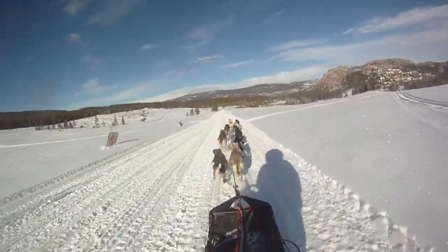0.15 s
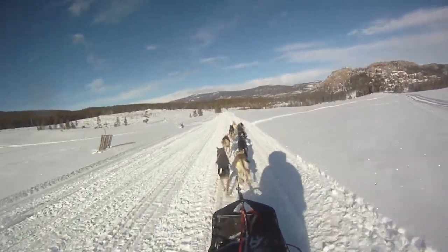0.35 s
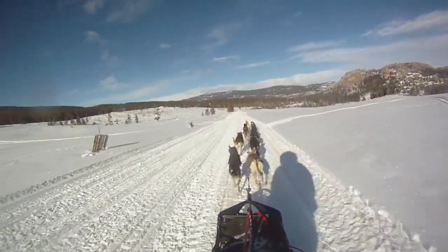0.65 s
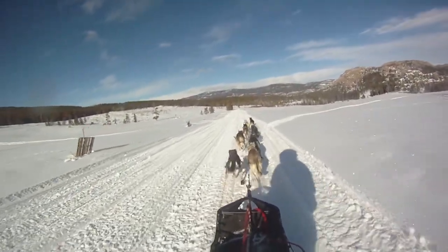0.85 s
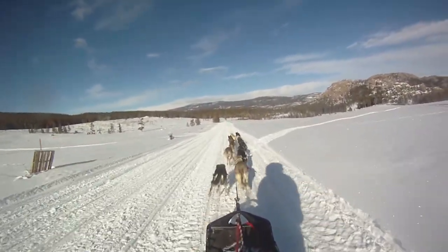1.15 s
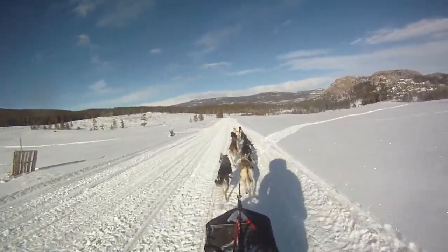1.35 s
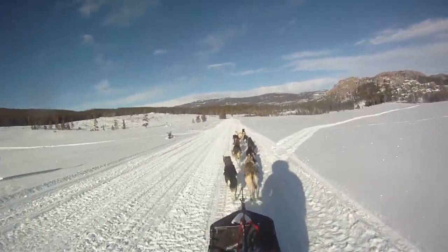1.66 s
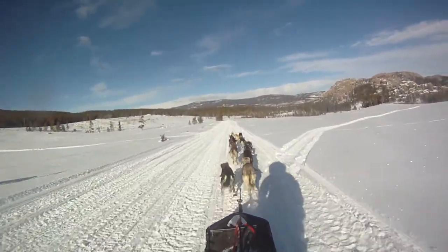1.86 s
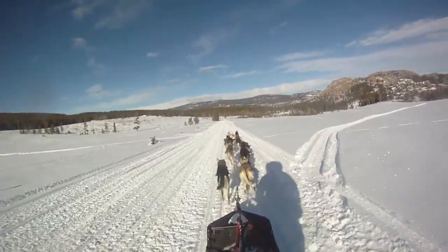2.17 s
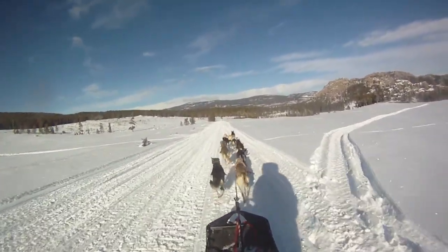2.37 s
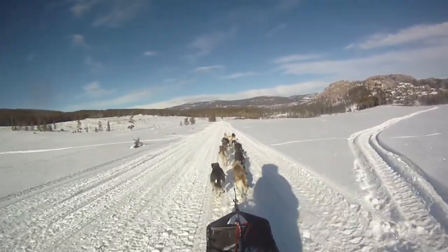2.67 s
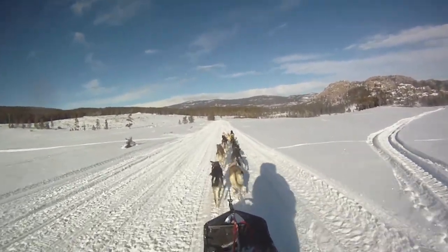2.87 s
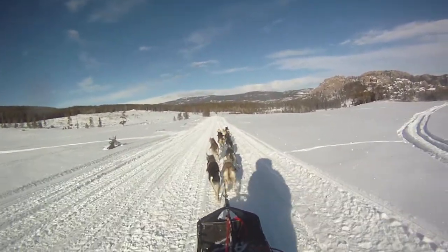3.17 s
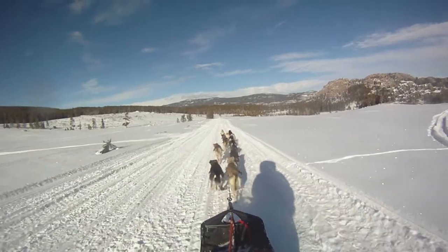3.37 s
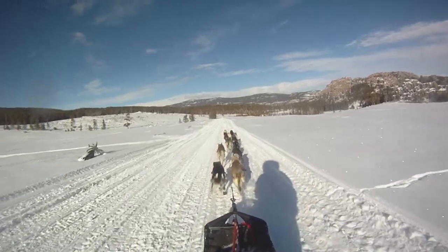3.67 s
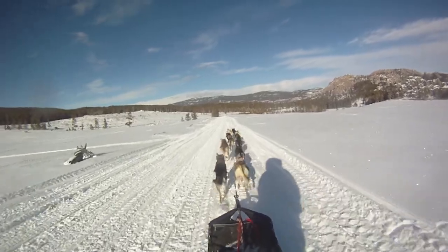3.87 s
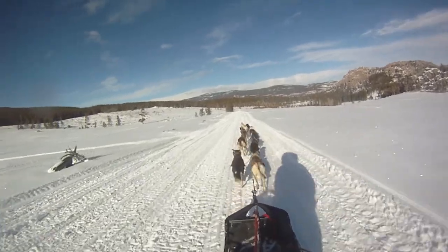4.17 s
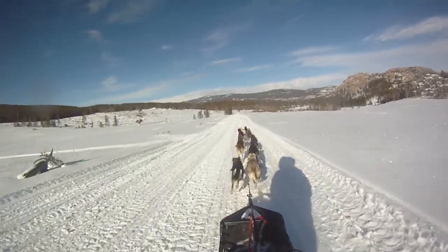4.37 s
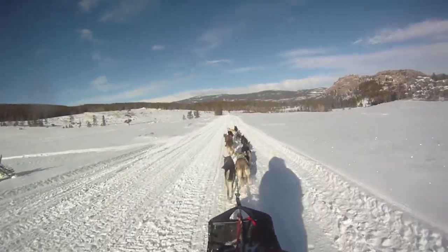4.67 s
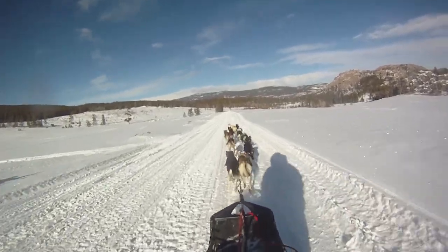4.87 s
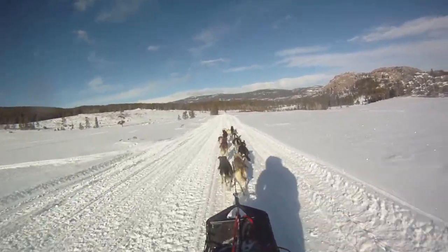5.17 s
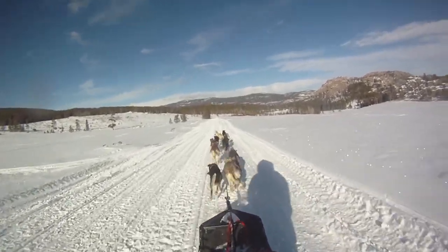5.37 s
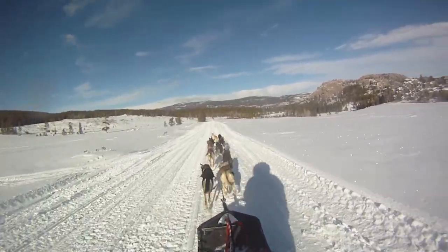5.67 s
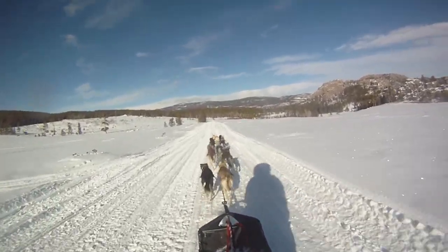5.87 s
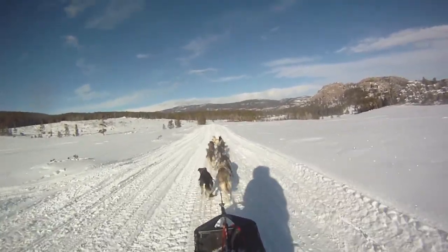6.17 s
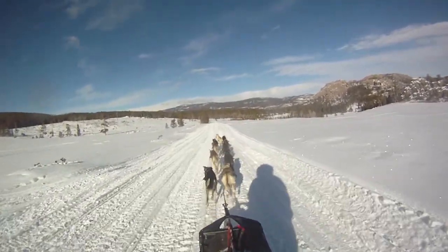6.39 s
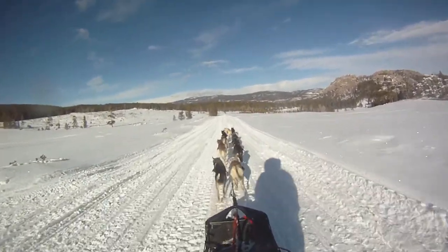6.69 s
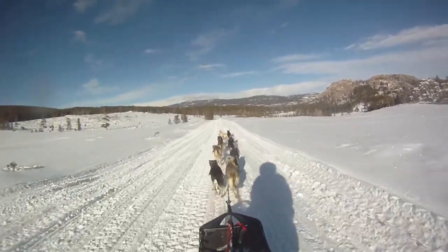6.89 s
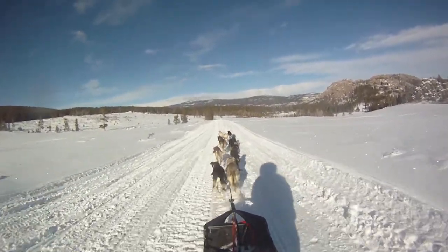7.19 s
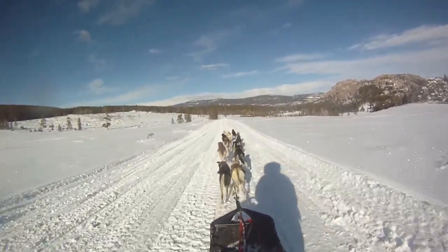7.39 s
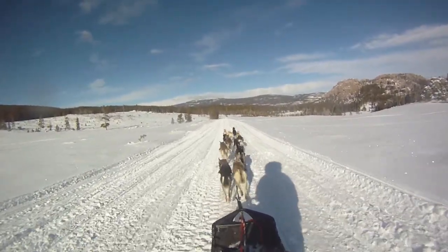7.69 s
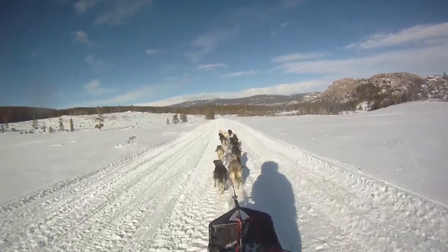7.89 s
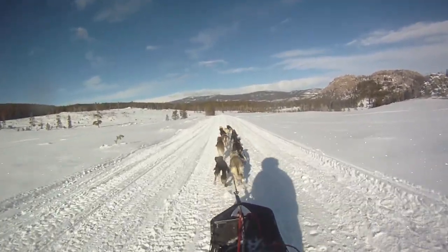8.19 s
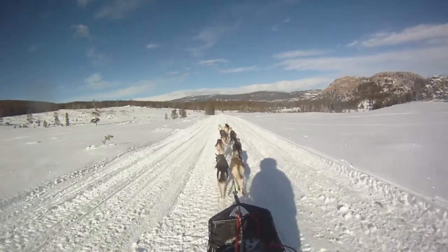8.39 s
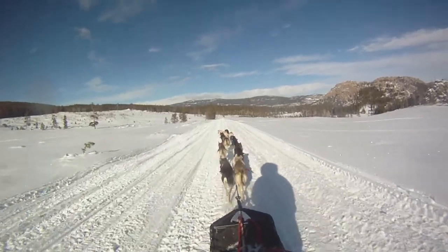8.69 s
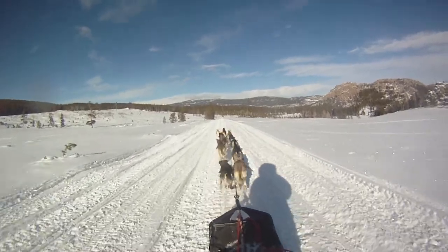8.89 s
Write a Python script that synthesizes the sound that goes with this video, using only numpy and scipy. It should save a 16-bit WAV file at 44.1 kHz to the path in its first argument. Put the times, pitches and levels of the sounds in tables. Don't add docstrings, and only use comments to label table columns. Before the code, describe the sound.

A sled runs fast behind dogs over packed snow. The runners give a constant boxy hiss and grainy crunch, broken by irregular knocks, crisp crust cracks and tiny pings. The wooden frame thrums low, metal snaps jingle faintly, and wind rumbles against a small enclosed microphone on the sled. One sharp tick comes past the six-second mark.

```python
import sys
import numpy as np
from scipy import signal
from scipy.io import wavfile
from scipy.ndimage import uniform_filter1d

SR = 44100
rng = np.random.default_rng(int(sys.argv[2]) if len(sys.argv) > 2 else 0)


def wav_record(signal):
    frames = np.transpose(np.atleast_2d(signal))
    bounded = np.clip(frames, -1, 1)
    quanta = np.round(bounded * 32767).astype(np.int16)
    wavfile.write(sys.argv[1], SR, quanta)


def how_loud(loudness_db):
    steps = np.asarray(loudness_db, float) / 20
    return 10 ** steps


N = 398663

# (time [s], glide level [dB], roughness of the trail [dB])
GLIDE = [(0, -46, -1), (.3, -49, -0.5), (.9, -49, -2.5), (1.5, -49.5, -0.5), (1.9, -49, -1.5),
         (2.4, -46.5, 0.5), (2.8, -48, 1), (3.2, -45.5, 0.5), (3.7, -46.5, 2.5), (4.2, -49, 1.5),
         (4.8, -46.5, 1.5), (5.5, -48, 0.5), (6, -46.5, -1), (6.8, -48.5, -1), (7.4, -48.5, -1.5),
         (8.2, -46, -1.5), (8.7, -48, 0.5), (9.04, -49, 1.5)]
# (frequency [Hz], density [dB per Hz])
HOUSING_SPECTRUM = [(310, -30), (520, -8.5), (716, -10), (913, -6), (1060, 1), (1240, -8.5), (1410, -10),
                    (1570, -4.5), (1665, 1.5), (1760, -.5), (1900, -2), (2100, -8.5), (2400, -16.5),
                    (3300, -54.5)]
# (frequency [Hz], density [dB per Hz])
CRISP_SPECTRUM = [(1700, -22), (2150, -12.5), (2330, -0.5), (2390, -17), (2550, -6), (2950, 0.5),
                  (3300, -3.5), (3750, -8.5), (4000, -6.5), (4600, -9.5), (5100, -12), (5700, -19.5),
                  (6000, -31), (6600, -63.5)]
# (time [s], peak level [dB], thud under it [dB])
BUMPS = [(0.081, -36, -3), (1.104, -39.5, 7), (1.249, -35.5, 7.5), (1.41, -37.5, 5.5), (1.792, -43, -3),
         (1.995, -36.5, 4.5), (2.185, -36.5, 8.5), (2.336, -37, 5), (2.396, -32, -2), (2.493, -38, 8),
         (2.625, -39, -2), (2.696, -35, -3), (2.929, -33.5, -5), (3.015, -35, 10.5), (3.088, -40, 12),
         (3.441, -37, 9), (3.522, -35, 4), (3.775, -40, 2), (4.097, -37.5, 10), (4.193, -39, 8.5),
         (4.383, -33, -2), (5.121, -44, 9), (5.925, -36.5, 0), (6.41, -37.5, 6), (6.467, -35, 0),
         (6.956, -31, 5), (7.067, -35, -7), (8.11, -41, -3), (8.334, -35, -8), (8.526, -37, 4)]
# (time [s], peak level [dB], frequency [Hz])
PINGS = [(0.094, -28, 1700), (0.412, -30, 1690), (0.788, -31.5, 1820), (0.9067, -28, 1830),
         (1.3266, -36, 1760), (2.373, -28, 1680), (3.008, -26, 1680), (3.0685, -26, 1670),
         (3.2101, -28, 1690), (3.4825, -34, 1800), (3.509, -26, 1720), (3.5369, -30, 1730),
         (3.5768, -32, 1680), (3.7407, -23, 1670), (4.3799, -35, 1700), (4.415, -27, 1650),
         (4.758, -29, 1670), (4.847, -37, 1830), (4.9407, -27, 1870), (5.3647, -27, 1620),
         (5.5543, -33, 1650), (6.0954, -36, 1620), (6.43, -37, 1830), (6.77, -28, 1700), (6.98, -30, 1850),
         (7.641, -32, 1660), (7.7183, -32, 1740), (8.327, -28, 1790), (8.537, -28, 1710),
         (9.0037, -33, 1940)]
# (time [s], peak level [dB])
CRACKS = [(0.21, -40), (0.4115, -42), (1.116, -36.5), (1.1313, -40), (1.296, -42), (2.2044, -38),
          (2.528, -39.5), (3.033, -38.5), (3.081, -38), (3.1542, -41), (3.1757, -37), (3.3862, -43),
          (3.403, -36.5), (3.5578, -38), (3.593, -40), (3.6666, -40), (3.8247, -37.5), (3.955, -41),
          (4.1335, -34), (4.2218, -49), (4.488, -37.5), (4.96, -39), (5.5363, -40.5), (5.962, -38),
          (6.953, -41), (7.0658, -42.5), (7.3397, -42), (7.4934, -40), (8.2392, -42), (8.964, -41)]
# (frequency [Hz], density [dB per Hz])
SHARD_SPECTRUM = [(1500, -31), (2300, 2.5), (3100, 7.5), (4200, -1.5), (5200, -1.5), (5900, -7.5),
                  (6600, -62)]
# (time [s], swell [dB])
JOLTS = [(0.08, 6), (0.72, 9.5), (0.8, 9.5), (0.91, 6.5), (1.53, 7), (1.71, 5), (2.1, 4.5), (2.2, 7.5),
         (2.83, 9.5), (3.22, 9.5), (3.3, 4), (3.97, 8.5), (4.2, 9), (4.78, 13), (5.12, 5.0), (5.32, 9.5),
         (5.67, 7), (5.74, 8), (6.43, 7), (7.01, 9.5), (7.65, 4), (8.01, 4.5), (8.69, 7.5), (8.83, 11.5)]
# (frequency [Hz], density [dB per Hz])
THRUM_SPECTRUM = [(80, -34.5), (120, -7), (150, -3), (204, 1), (235, -6), (270, -13.5), (400, -50.5)]
# (frequency [Hz], density [dB per Hz])
RATTLE_SPECTRUM = [(160, -30), (240, -2.5), (300, -3), (420, -5.5), (500, -12), (640, -20), (830, -43),
                   (1400, -90)]
# (time [s], upper ring level [dB], lower ring level [dB])
JINGLES = [(1.1304, -52, -53), (2.2068, -52, -54), (2.6179, -48, -54), (2.8953, -59, -50), (3.03, -47, -58),
           (3.0809, -57, -58), (3.1792, -45, -59), (3.2495, -49, -49), (3.382, -56, -49), (3.409, -56, -49),
           (3.5956, -45, -57), (3.704, -52, -55), (3.8107, -52, -53), (3.9544, -60, -46), (4.133, -52, -53),
           (4.774, -55, -56), (4.8933, -49, -47), (4.963, -41.5, -52), (5.5363, -55, -58),
           (5.9587, -45, -57), (5.979, -53, -49), (6.0447, -53, -62), (6.368, -44, -63), (8.1694, -52, -60),
           (8.2384, -48, -61), (9.01, -55, -56), (9.019, -49, -60)]
# (frequency [Hz], 60 dB decay time [s])
SNAP_MODES = [
    (4222, .06),
    (3235, .08),
]
# (time [s], peak level [dB], frequency [Hz], 60 dB decay time [s])
ICE_TICKS = [
    (6.6103, -19, 2700, .0032),
    (6.6104, -29, 1700, .008),
    (6.6129, -31, 2700, .005),
]
# (time [s], strength [dB], turbulence [dB])
WIND = [(0, -37, -1), (.35, -39, 0), (.8, -45, 0.5), (1.15, -35.5, -2.5), (1.7, -39, -2.5), (2.2, -37, -1),
        (2.7, -41.5, 3.5), (3.1, -34.5, -1), (3.8, -33.5, -3.5), (4.3, -38, -3), (4.7, -41, 1),
        (5.1, -36, -4), (5.7, -32.5, 0.5), (6.3, -35.5, -4), (7, -40.5, 1.5), (7.4, -34.5, -6),
        (8.2, -37, -1), (9.04, -38, -2)]
# (frequency [Hz], density [dB per Hz])
BUFFET_SPECTRUM = [(9, -29.5), (16, -7), (30, -2), (36, -4.5), (43, 4), (50, -5), (60, -8), (75, -15),
                   (100, -44.5), (160, -90)]
# (frequency [Hz], density [dB per Hz])
FLUTTER_SPECTRUM = [(40, -32), (54, -4.5), (63, 0), (72, -2.5), (85, -3), (100, -7), (125, -10.5),
                    (160, -26.5), (300, -90)]
# (time [s], swell [dB])
SHOVES = [(0.35, 7), (1.09, 8), (1.28, 5), (1.84, 5.5), (2.1, 1), (2.41, 7), (2.93, 3), (3.01, 5),
          (3.59, 5.5), (3.83, 4.5), (3.97, 4.0), (4.63, 9.5), (4.97, 11), (5.05, 8), (5.48, 1), (5.76, -1),
          (6.44, 5), (7.35, 2), (7.51, 7.5), (7.74, 4.0), (7.86, 1), (8.06, 5.5), (8.56, 10), (8.68, 7.5)]
# (time [s], swell [dB])
EDDIES = [(0.09, 6.5), (0.43, 3), (1.11, 4.5), (1.21, 6), (1.46, 5.5), (1.68, 8.5), (2.0, 6), (2.5, 4),
          (3.11, 3), (3.18, 4), (3.61, 3), (3.9, 8), (4.45, 4.0), (4.94, 9), (5.11, 7), (5.7, 3.5),
          (6.28, 4.0), (6.75, 3), (6.96, 6), (7.65, 5.5), (7.86, 7), (8.34, 5.5), (8.68, 6), (8.93, 5)]

USUAL_GLIDE_DB = -47.5


def evened(x):
    return x / np.sqrt(np.mean(x ** 2) + 1e-20)


def curve(rows):
    s, *columns = np.transpose(rows)
    return [np.interp(np.arange(N) / SR, s, c) for c in columns]


def swells(rows, half_s):
    t = np.arange(0, N, 64) / SR
    s, db = np.transpose(rows)
    bells = np.exp(-((t[:, None] - s) / half_s) ** 2)
    return np.interp(np.arange(N) / SR, t, (db * bells).sum(axis=1))


def wobble(hz):
    size = max(int(SR / hz), 1)
    once = uniform_filter1d(rng.standard_normal(N), size)
    return evened(uniform_filter1d(once, size))


def grains(per_s, spread_db):
    chance = rng.random(N)
    size = np.minimum(rng.exponential(1, N), 4)
    sign = rng.choice([-1., 1.], N)
    return evened((chance < per_s / SR) * sign * how_loud(spread_db * size))


def colour(points, size=8192):
    f, db = np.transpose(points)
    hz = abs(np.fft.fftfreq(size, 1 / SR))
    level_db = np.interp(np.log(hz + 1), np.log(f + 1), np.maximum(db, -70))
    log_gain = level_db * np.log(10) / 20
    taps = np.fft.ifft(np.exp(np.conj(signal.hilbert(log_gain)))).real[:size // 2]
    return taps / np.linalg.norm(taps)


def through(x, taps):
    return signal.oaconvolve(x, taps)[:len(x)]


def steadied(x, share, span_s):
    swell = uniform_filter1d(x ** 2, int(span_s * SR)) + 1e-3
    return evened(x / swell ** (np.clip(share, 0, 1) / 2))


def ring(hz, t60):
    t = np.arange(6000) / SR
    return how_loud(-60 * t / t60) * np.sin(2 * np.pi * hz * t)


def soft_rise(length, rise_s):
    return 1 - np.exp(-np.arange(length) / SR / rise_s)


def add(mix, s, sound):
    part = mix[round(s * SR):][:len(sound)]
    part += sound[:len(part)]


def runners(shake_db):
    level_db, _ = curve(GLIDE)
    crisp_db = -55.5 + 0.55 * (level_db - USUAL_GLIDE_DB)
    hiss, crisp_hiss = rng.standard_normal((2, N))
    crunch = grains(per_s=700, spread_db=2.0)
    fizz = grains(per_s=300, spread_db=0.5)
    low = through(hiss + 0.83 * crunch, colour(HOUSING_SPECTRUM))
    low = steadied(low, share=0.78, span_s=0.17)
    low *= how_loud(level_db + 0.6 * wobble(hz=4.6) + 1.24 * shake_db + 1.21 * wobble(hz=82))
    high = through(crisp_hiss + 0.19 * crunch + 0.34 * fizz, colour(CRISP_SPECTRUM))
    high = steadied(high, share=0.32, span_s=0.16)
    high *= how_loud(crisp_db + 0.84 * shake_db + 0.58 * wobble(hz=60))
    return low + high


def knocks():
    out = np.zeros(N)
    modes = 1.25 * ring(hz=1046, t60=0.027)
    modes += 0.53 * ring(hz=720, t60=0.013)
    modes += 0.28 * ring(hz=1680, t60=0.016)
    rise = soft_rise(len(modes), rise_s=0.0015)
    for s, db, _ in BUMPS:
        add(out, s, how_loud(db + 2.5) * rise * modes)
    for s, db, hz in PINGS:
        add(out, s, how_loud(db - 1.0) * rise * ring(hz, t60=0.022))
    return out


def cracks():
    out, bright = np.zeros(N), colour(SHARD_SPECTRUM)
    t = np.arange(2000) / SR
    when, size = rng.random((40, 2)).T
    small_db = -43.5 + 3.5 * (2 * size - 1)
    rows = CRACKS + list(zip(when * N / SR, small_db))
    rise = soft_rise(len(t), rise_s=0.001)
    for s, db in rows:
        crumble_s = np.clip(0.0069 * how_loud(0.43 * (db + 42.0)), 0.002, 0.02)
        fall = np.exp(-t / crumble_s) + np.exp(-t / 0.00085)
        burst = through(rng.standard_normal(len(t)) * fall * rise, bright)
        add(out, s, how_loud(db - 0.6) * burst / abs(burst).max())
    return out


def frame(shake_db):
    glide_db, rough_db = curve(GLIDE)
    thrum_db = -40.5 + rough_db + swells(JOLTS, half_s=0.019) + 1.46 * wobble(hz=20)
    rattle_db = -46 + rough_db + 0.37 * (glide_db - USUAL_GLIDE_DB) + 1.1 * wobble(hz=11)
    low, slats = colour(THRUM_SPECTRUM), colour(RATTLE_SPECTRUM)
    a, b = rng.standard_normal((2, N))
    thrum = steadied(through(a, low), share=0.41, span_s=0.052)
    rattle = through(b + 0.72 * grains(per_s=90, spread_db=3.0), slats)
    rattle = steadied(rattle, share=0.68, span_s=0.067)
    out = how_loud(thrum_db + 1.6 * shake_db) * thrum
    out += how_loud(rattle_db + 1.36 * shake_db) * rattle
    thud = 0.76 * low + 0.68 * slats
    thud /= abs(thud).max()
    for s, db, thud_db in BUMPS:
        add(out, s, how_loud(db + thud_db - 3.5) * thud)
    return out


def snaps():
    out = np.zeros(N)
    rise = soft_rise(6000, rise_s=0.0015)
    for s, *levels_db in JINGLES:
        hit = rise * sum(how_loud(db + 2.3) * ring(*mode) for db, mode in zip(levels_db, SNAP_MODES))
        rebound_s = 0.006 * rng.uniform(0.7, 1.5)
        add(out, s, hit)
        add(out, s + rebound_s, how_loud(-5) * hit)
    return out


def ice_chip():
    out = np.zeros(N)
    for s, db, hz, t60 in ICE_TICKS:
        tick = ring(hz, t60)
        cycles = np.arange(len(tick)) / SR * hz
        add(out, s, how_loud(db) * tick * np.minimum(cycles / 0.6, 1))
    return out


def wind():
    level_db, turbulence_db = curve(WIND)
    a, b = rng.standard_normal((2, N))
    buffet = steadied(through(a, colour(BUFFET_SPECTRUM)), share=0.69, span_s=0.067)
    flutter = steadied(through(b, colour(FLUTTER_SPECTRUM)), share=0.48, span_s=0.059)
    buffet *= how_loud(swells(SHOVES, half_s=0.029) + 1.6 * wobble(hz=12.6))
    flutter *= how_loud(turbulence_db + swells(EDDIES, half_s=0.027) + 1.1 * wobble(hz=14))
    return how_loud(level_db) * (buffet + flutter)


def scene():
    shake_db = 0.91 * wobble(hz=90) + 0.56 * wobble(hz=40.6)
    sled = runners(shake_db) + knocks() + cracks() + frame(shake_db) + snaps()
    return (sled + ice_chip() + wind())[None]


def roll_off(x):
    return signal.sosfilt(signal.butter(12, 15840, fs=SR, output="sos"), x)


def record(dry):
    kept_hz, repeat = 12000, 4
    kept = signal.resample_poly(dry, kept_hz, SR, axis=1)
    steps = np.repeat(kept, repeat, axis=1)
    x = signal.resample_poly(steps, SR, kept_hz * repeat, axis=1)[:, :N]
    x = np.pad(x, ((0, 0), (0, N - x.shape[1])))
    edge = signal.firwin(1023, 15290, window=("kaiser", 8), fs=SR)
    mix = signal.oaconvolve(x, edge[None], "same")
    return roll_off(mix)


dry = scene()
out = record(dry)
wav_record(out)
```